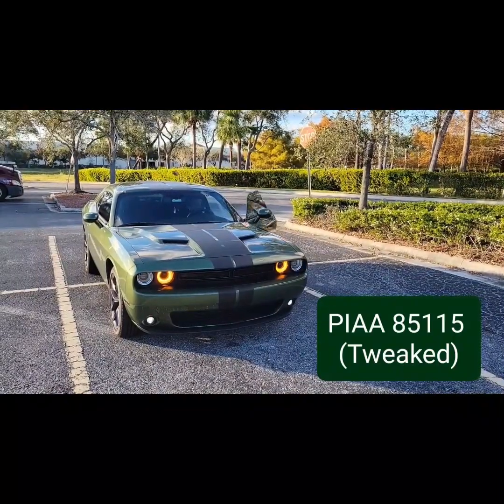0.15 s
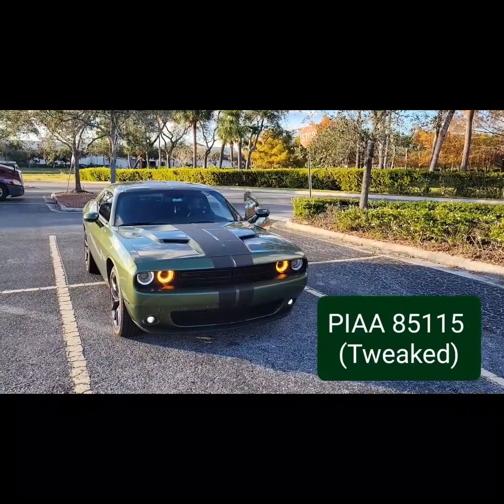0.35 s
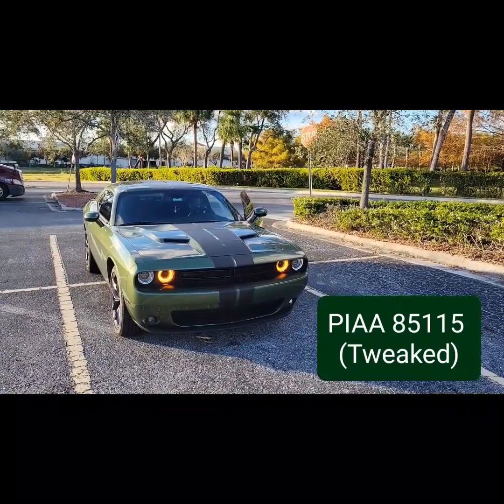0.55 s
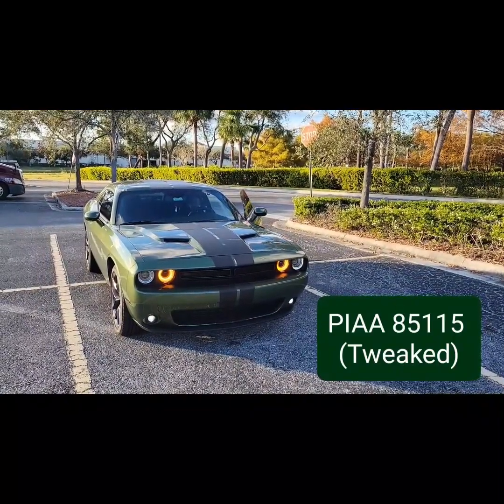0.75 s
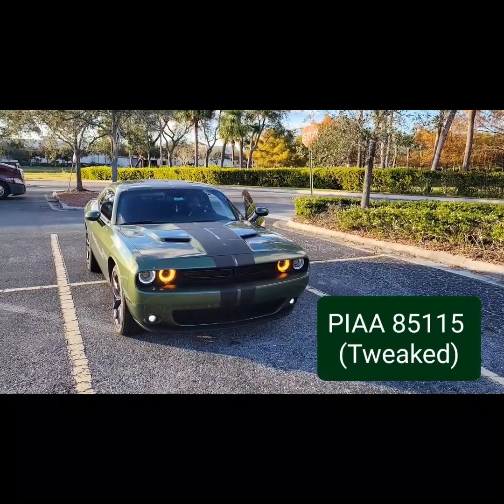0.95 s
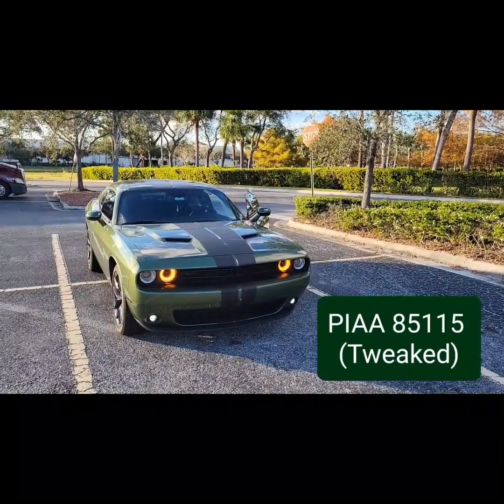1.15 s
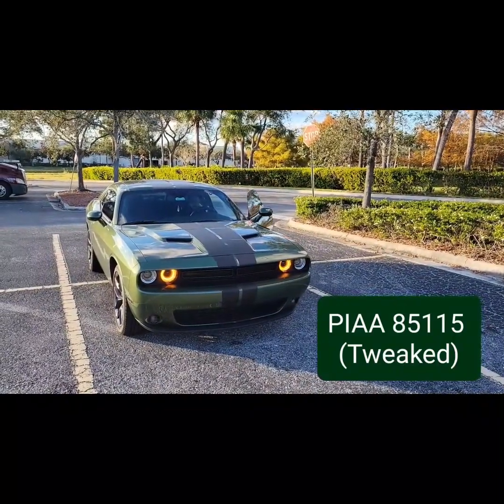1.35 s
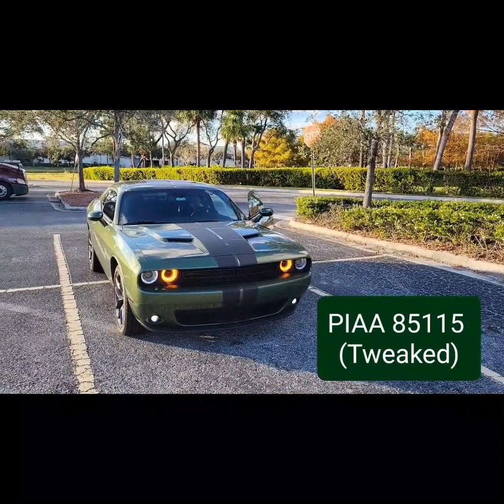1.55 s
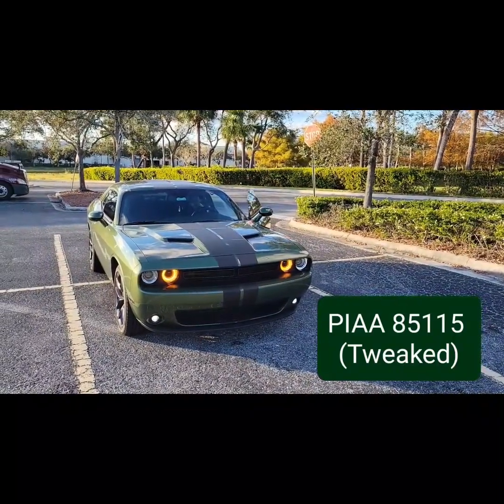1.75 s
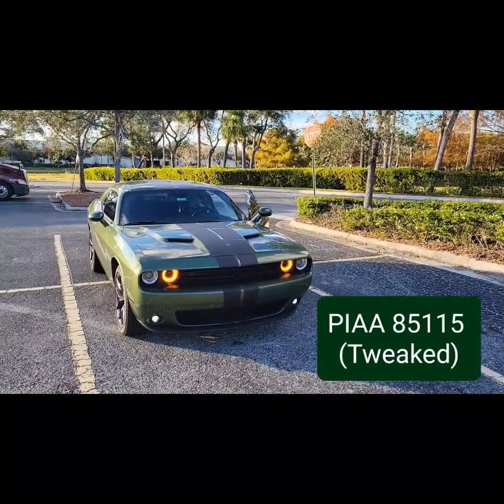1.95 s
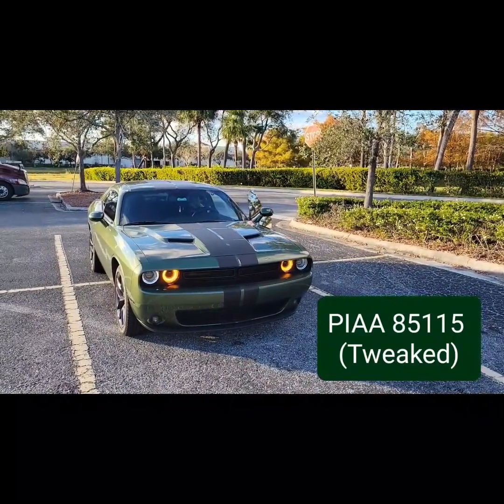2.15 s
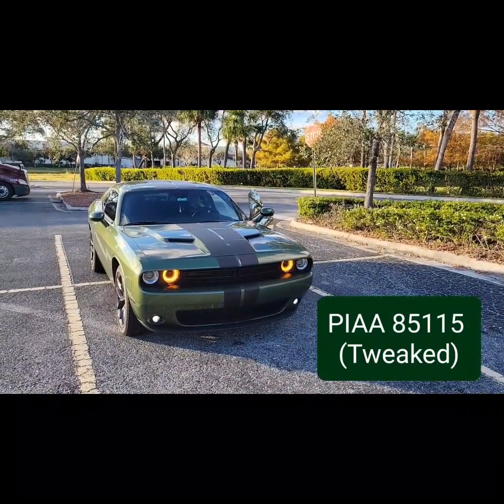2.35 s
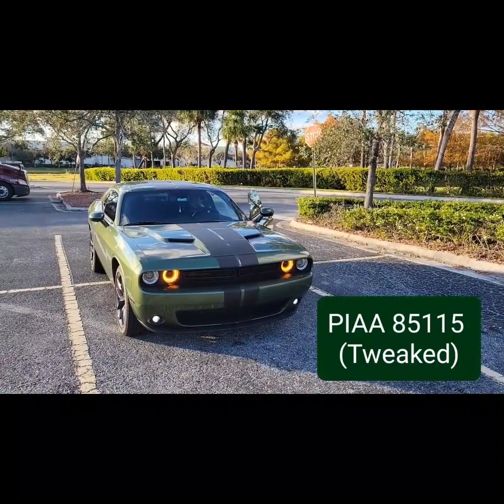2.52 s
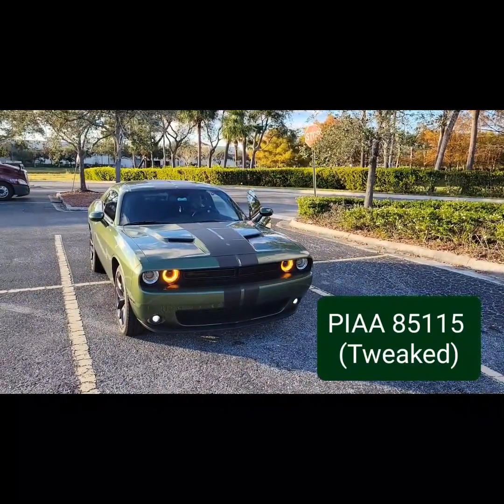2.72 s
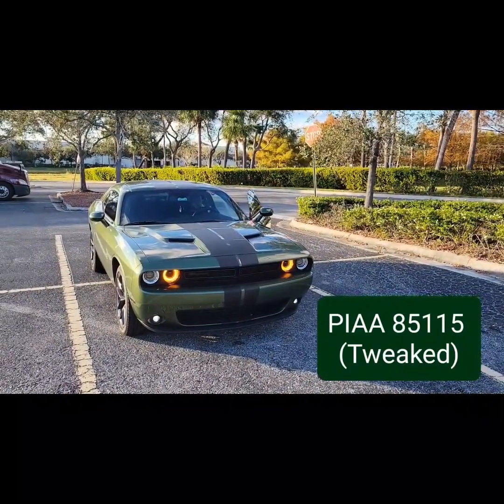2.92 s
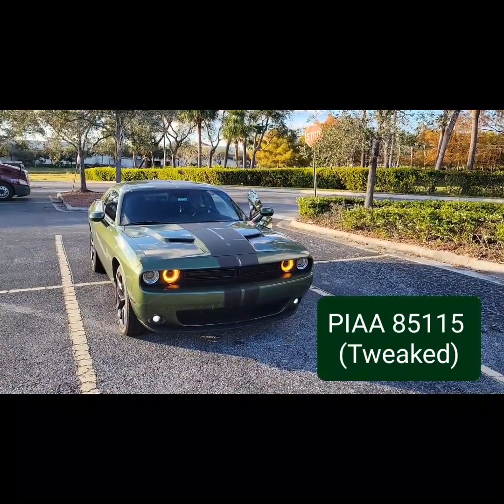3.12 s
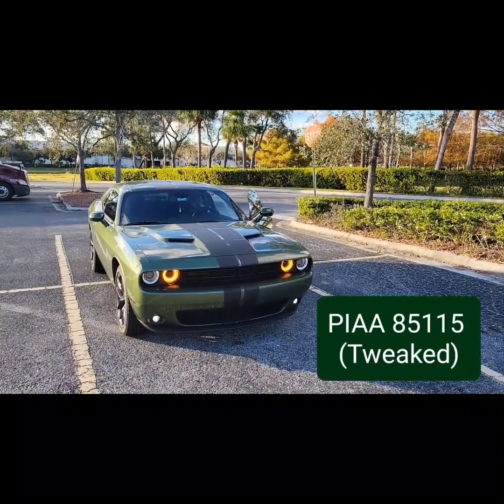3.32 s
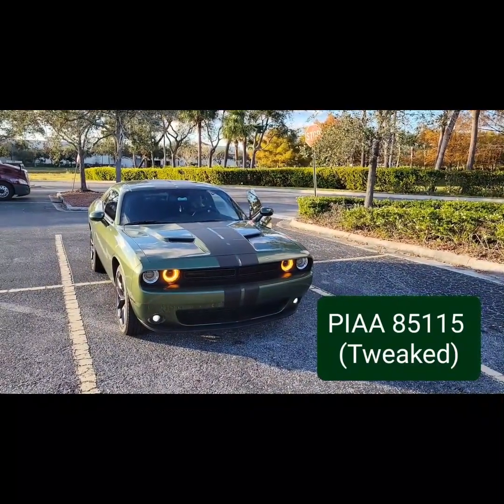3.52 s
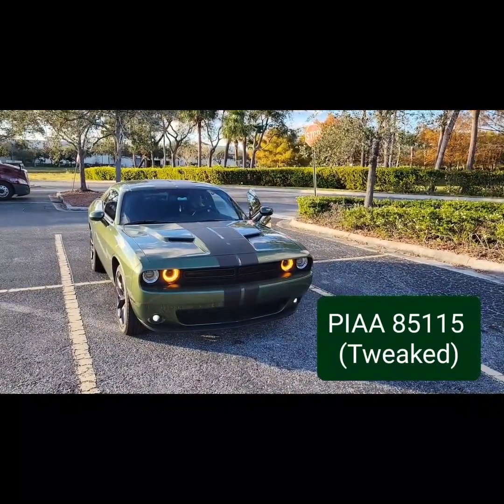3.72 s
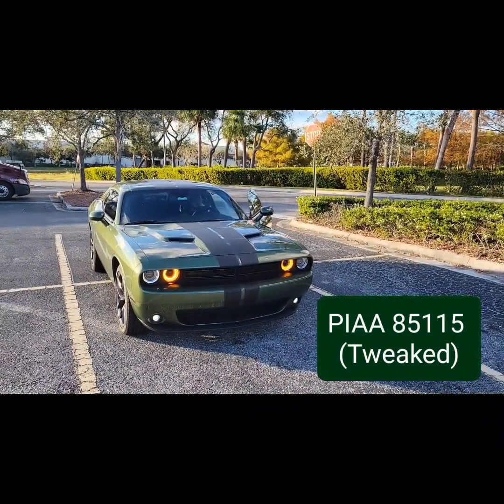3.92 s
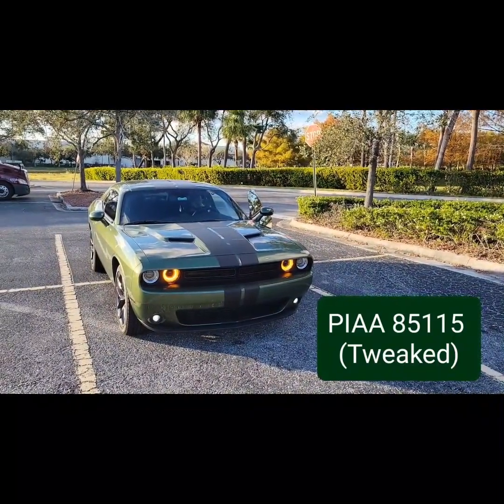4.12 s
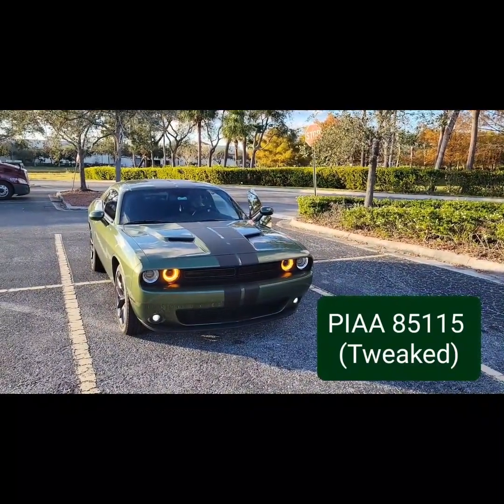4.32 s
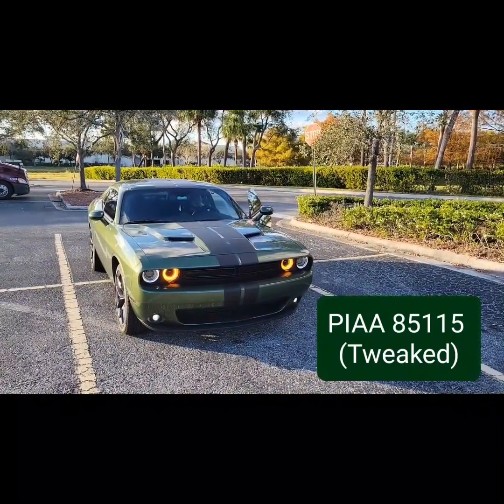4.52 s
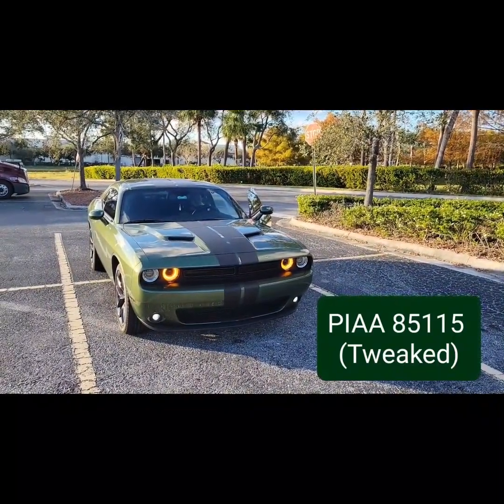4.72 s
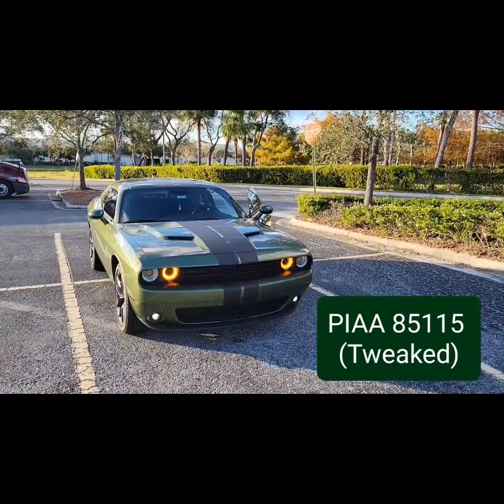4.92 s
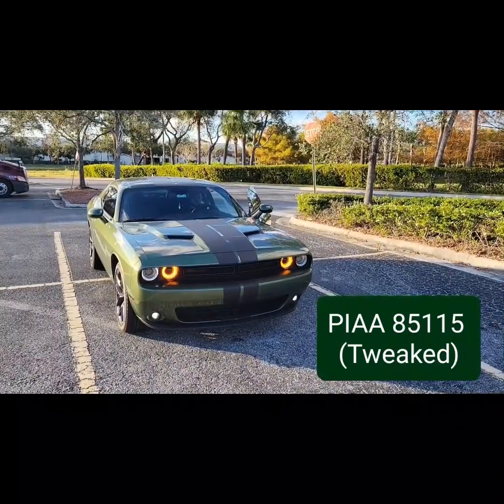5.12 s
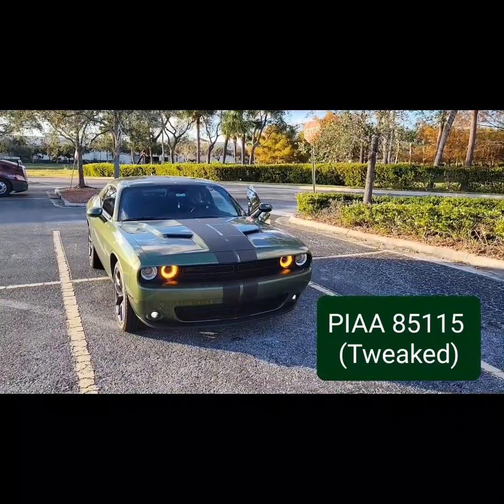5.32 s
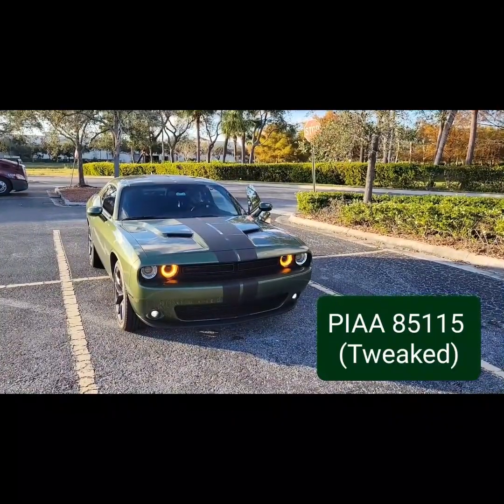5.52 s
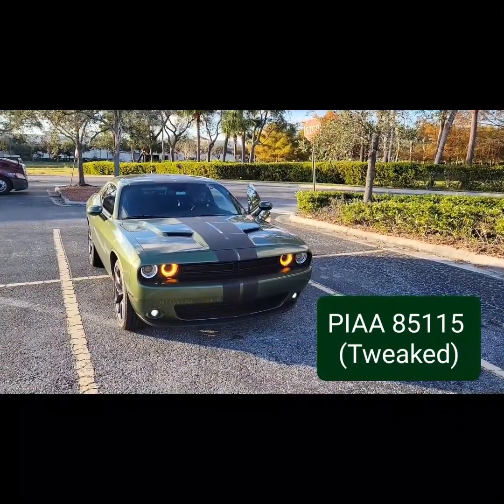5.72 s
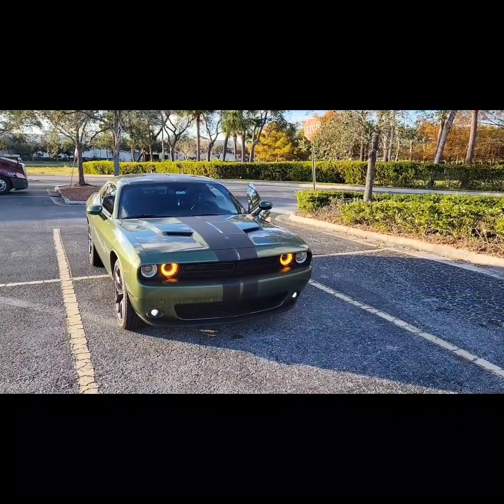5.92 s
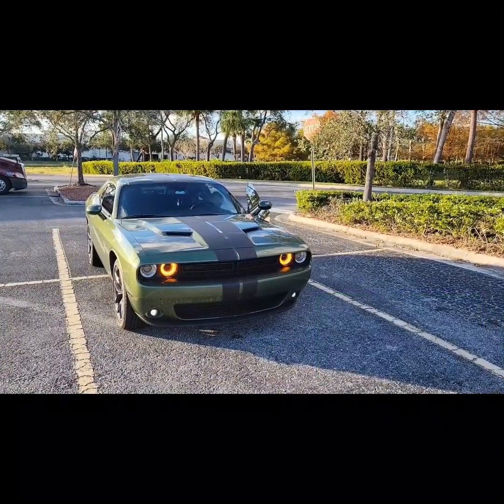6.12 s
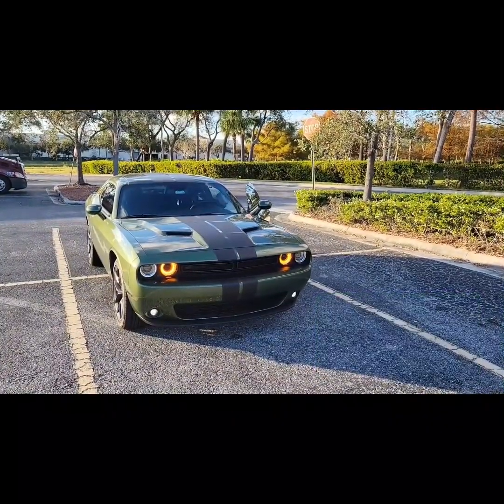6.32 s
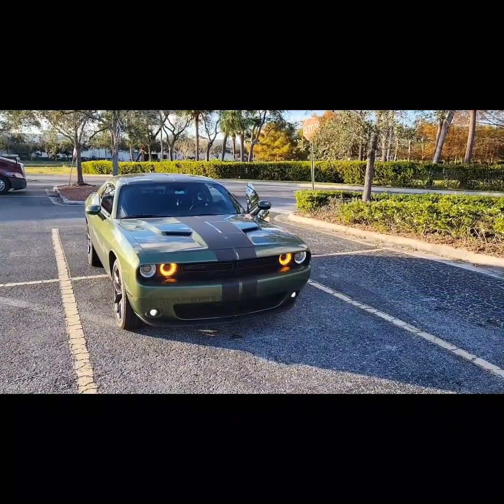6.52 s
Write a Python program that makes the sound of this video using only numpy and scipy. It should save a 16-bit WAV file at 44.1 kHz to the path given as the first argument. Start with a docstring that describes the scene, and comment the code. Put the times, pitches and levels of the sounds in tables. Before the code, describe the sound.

In an open parking lot, light wind and a humming idling car precede one quick two-tone horn blip, then three short, loud, brassy honks.

```python
"""A tree-lined parking lot outdoors: an idling car sounds two electric trumpet horns, a major third apart.
Close by: one blip, then three short honks. Summed partials scoop up with a bright bark, buzz and sag;
shaped noise adds rasp and sizzle, and echoes with a decaying tail carry the horns over the lot.
Behind, a dying noise breeze bumps the microphone, the engine hums, and distant traffic, hoots and chirps lie.
The horns make the phone turn its gain down, and the background only creeps back."""
import sys
import numpy as np
from scipy import signal
from scipy.fft import rfft, irfft, next_fast_len
from scipy.io import wavfile
from scipy.ndimage import uniform_filter1d, map_coordinates

SR = 44100
rng = np.random.default_rng(int(sys.argv[2]) if len(sys.argv) > 2 else 0)


def pcm_store(signal):
    """Save signal as 16-bit PCM."""
    levels = np.round(np.clip(np.atleast_2d(signal), -1, 1) * 32767)
    wavfile.write(sys.argv[1], SR, levels.astype(np.int16).T)


N = 294033
T = np.arange(N) / SR  # t/s

# Spectra below give only the colour of a noise; its loudness is set where it is used.
# horn button: (press t/s, release t/s, honk gain level/dB, extra gain of the contact noise level/dB)
HONKS = [(2.677, 2.777, 6.5, 1), (2.918, 3.195, 6.5, 0.5), (3.658, 4.011, 7, -0.5),
         (4.578, 4.815, 6.5, -0.5)]
LOW_HZ, HIGH_HZ = 348.4, 440.25  # nominal horn pitches
# partials of each horn, before build-up, fade and honk gain:
# (multiple of the pitch, full-swing level/dB, starting or stopping level/dB, left-right level/dB)
LOW_PARTIALS = [(1, -17.5, -21.5, -1), (2, -31, -33, 2), (3, -31, -35, 4), (4, -26.5, -33, -3.5),
                (5, -43.5, -27, -1), (6, -38, -23, -4), (7, -74, -51, 11), (8, -73, -45, -1),
                (9, -62, -49.5, -10), (10, -59.5, -48, -2), (11, -58, -50, 3)]
HIGH_PARTIALS = [(1, -32, -26.5, -2), (2, -31.5, -21.5, 1.5), (3, -37.5, -23, -0.5), (4, -33, -30.5, 5),
                 (5, -45, -30, 4), (6, -43, -33.5, 9), (7, -56, -36, 5), (8, -50.5, -45, -9),
                 (9, -68, -43, -10.5), (10, -59.5, -58, -16), (11, -55.5, -57, 14), (12, -55.5, -55, 23.5),
                 (13, -56, -60, 3), (14, -49.5, -63, 16), (15, -47, -62, 14), (16, -44.5, -63, 2),
                 (17, -43.5, -53, 3), (18, -48.5, -63, -4.5)]
# the high horn's thin top partials: same columns
HIGH_OVERTONES = [(26.9, -51, -60, 6), (29, -55, -54, 2), (30, -65, -51, 3), (31, -52, -60, 5),
                  (32, -54, -62, 7), (33, -50, -66, 10), (34, -48.5, -55, 13), (35, -54, -56, 8)]
# the low diaphragm's uneven swing on alternate cycles: same columns
LOW_HALFTONES = [(.5, -53.5, -46, -1), (1.5, -40.5, -53, 6), (3.5, -52.5, -49, -11)]
# resonances of the trumpet bells: (centre f/Hz, width f/Hz, level/dB)
BELL_RESONANCES = [(395, 22, -7), (805, 100, -5), (1255, 70, -3), (2870, 160, 3), (3300, 200, -2)]
# phase between the two microphone ports: (f/Hz, lead of the left port/rad)
PORT_LEAD = [(350, -.38), (440, -.35), (700, 1.1), (880, .9), (1100, .1), (1400, .3), (2600, .8),
             (7000, -.4), (15000, -.6)]
# spectrum of the rasp of diaphragms and contacts: (f/Hz, relative level/dB per Hz)
RASP_SPECTRUM = [(150, -9.5), (300, -1.5), (450, 4.5), (620, -8.5), (820, 3), (1050, -2.5), (1280, 5.5),
                 (1550, -10.5), (1850, -0.5), (2350, -9.5), (2750, -6), (4000, -19), (6000, -38)]
# spectrum of the contact sizzle: (f/Hz, relative level/dB per Hz)
SIZZLE_SPECTRUM = [(2500, -30), (3400, -7), (4300, -8.5), (5200, -8), (6000, -7.5), (7300, -3), (8300, -8),
                   (9700, -9), (12000, -6.5), (14500, -3.5), (15700, -5.5)]
# balance of the sizzle: (f/Hz, left-right level/dB)
SIZZLE_BALANCE = [(4000, 2.5), (8000, 0), (11000, 0.5), (14000, 4.5)]
# slaps from hedge, trees and buildings: (delay t/s, level/dB, left-right level/dB)
SLAPS = [(.058, -13.5, 3), (0.114, -24, -2), (.195, -31, -2), (.28, -35.5, 6)]
# colour of those slaps: (f/Hz, level/dB)
SLAP_COLOUR = [(340, -9.5), (440, 2), (690, -14.5), (880, 0), (1050, -8), (1390, -17), (1760, -15.5),
               (3000, -21), (7000, -10), (12000, -23)]
# decay of the lot's tail: (f/Hz, time to fall 60 dB t/s)
LOT_DECAY = [(200, 0.41), (900, 0.7), (2000, 0.73), (6000, 0.3), (14000, 0.22)]
IDLE_HZ = 35.1  # engine firing rate
# engine hum: (multiple of the firing rate, mean level/dB)
IDLE_PARTIALS = [(1, -56), (2, -45.5), (3, -40.5), (4, -53.5), (5, -63), (6, -67), (7, -60), (9, -59.5)]
# spectrum of the breeze on the microphone: (f/Hz, relative level/dB per Hz)
WIND_SPECTRUM = [(12, -46), (20, -11), (55, 6.5), (97, 2.5), (115, 2), (136, -13.5), (317, -22), (395, -25),
                 (450, -50), (580, -63), (990, -120)]
# likeness of the wind at the two ports: (f/Hz, left-right correlation)
WIND_LIKENESS = [(30, 0.1), (100, 0.54), (400, 0.083)]
BREEZE_DB, LULL_DB = -36.5, -40  # mean wind level at first, and once it has dropped
LULL_AT_S, LULL_TAKES_S = 2.03, 0.68  # start and length of the drop
GUST_DB, GUST_KNOTS_PER_S = 1.5, 8.3  # depth and pace of the random gusts
# puffs of wind on the microphone: (t/s, half-length t/s, level/dB, centre f/Hz)
PUFFS = [(0.466, 0.044, -41, 222), (0.82, 0.045, -37, 277), (0.896, 0.02, -25, 108),
         (0.957, 0.03, -32.5, 127), (1.508, 0.015, -30.5, 147), (1.638, 0.019, -23, 69.6),
         (1.843, 0.029, -26, 64), (2.314, 0.014, -26, 97), (3.75, 0.042, -26.5, 97),
         (5.882, 0.034, -30.5, 73.12)]
# spectrum of the distant traffic: (f/Hz, relative level/dB per Hz)
TRAFFIC_SPECTRUM = [(110, -18), (180, -3), (327, -6.5), (618, -15), (788, -8), (1150, -7), (1570, -19),
                    (1970, -16), (2510, -21.5), (2970, -17.5), (5510, -30.5), (7860, -27.5), (8960, -35),
                    (12500, -34.5), (15700, -40)]
TRAFFIC_DB, TRAFFIC_DRIFT_DB = -47, 0.95  # mean level and depth of its drift
# likeness of the outdoor noise, ticks and hiss: (f/Hz, left-right correlation)
LIKENESS = [(60, 0.92), (150, 0.99), (380, 0.3), (950, -0.58), (2380, 0.35), (5980, 0.15), (15000, 1)]
# dove-like notes: (t/s, peak level/dB)
HOOTS = [(0.491, -43), (0.815, -52.5), (1.54, -56), (2.212, -46)]
HOOT_HZ, HOOT_S, HOOT_GLIDE = 530, 0.059, -.01  # pitch, half-length, pitch share gained across the note
# nearest small birds: (t/s, pitch f/Hz, peak level/dB)
NEAR_CHIRPS = [(.18, 3980, -59), (1.73, 4120, -60), (2.57, 7800, -57.5), (4.4, 4170, -55.5)]
CHIRP_S, CHIRP_GLIDE = 0.054, -0.011  # half-length, pitch share gained across the note
FAR_CHIRP_HZ, FAR_CHIRP_SPREAD, FAR_CHIRP_DB = 7900, .1, -63.5  # mid pitch, its spread share, peak level
# faint dry ticks: (t/s, half-length t/s, level/dB, centre f/Hz)
TICKS = [(.58, 0.017, -47.5, 3100), (5.635, 0.011, -49, 3250), (5.736, 0.0013, -44, 10900)]
CEILING_DB, GRIP, RECOVER_DB_PER_S = -13.5, 0.8, 0.97  # threshold, share of excess removed, recovery
SENSE_S, CLAMP_S = 0.048, 0.0073  # level window and reaction time of the gain control
HISS_DB, TOP_HZ = -63, 15800  # the phone's own noise and its band limit
# spectrum of that noise: (f/Hz, relative level/dB per Hz)
HISS_SPECTRUM = [(1000, 0), (5000, -15), (8000, 3), (10000, -2.5), (15700, 4.5)]


def horns():
    """Both trumpets through their bells, with the rasp and sizzle of diaphragms and contacts."""
    low = horn(LOW_PARTIALS + LOW_HALFTONES, LOW_HZ, scoop=.06, sag=.04, settle_s=.04, rise_s=0.019,
               stop_s=0.0408, fade_db_per_s=492, ring_s=0.03, jitter=0.003, rough=0.15, pull=0.0029)
    high = horn(HIGH_PARTIALS + HIGH_OVERTONES, HIGH_HZ, scoop=.115, sag=.085, settle_s=.048, rise_s=0.011,
                stop_s=.022, fade_db_per_s=481, ring_s=0.024, jitter=0.00325, rough=0.21, pull=0.0015)
    # half the lead goes to each port, in opposite directions
    ports = lambda hz: np.exp(np.array([[.5j], [-.5j]]) * along(PORT_LEAD, hz))
    tones = filtered(low + high, lambda hz: bell(hz) * ports(hz))
    _, _, gain, contact_gain = button()
    return tones + gain * contact_gain * (rasp() + sizzle())


def horn(partials, pitch_hz, scoop, sag, settle_s, rise_s, stop_s, fade_db_per_s, ring_s, jitter, rough, pull):
    """A buzzing diaphragm on a coiled trumpet: flat and of another timbre until it reaches full swing."""
    held, free, gain, _ = button()
    stopping = ease(free / stop_s)
    swing = ease((held - settle_s / 2) / (0.59 * settle_s)) * (1 - stopping)
    flat = scoop * np.clip(1 - held / settle_s, 0, 1) + sag * stopping
    # the horns pull on each other at the beat of their nearly shared partial
    beat = np.sin(2 * np.pi * (4 * HIGH_HZ - 5 * LOW_HZ) * T)
    pitch = pitch_hz * (1 - flat + pull * beat + jitter * wobble(600) + 0.00044 * wobble(12))
    phase = 2 * np.pi * np.cumsum(pitch) / SR

    out = np.zeros((2, N))
    live = (held > -.005) & (free < .25)
    held, free, swing, phase, stopping = held[live], free[live], swing[live], phase[live], stopping[live]
    # the diaphragm coasts for a moment before its swing collapses
    dying = np.hypot(free, ring_s) - ring_s
    for k, full_db, loose_db, pan_db in partials:
        # upper partials build up later, die sooner and flutter more
        build = ease((held + 0.0031) / (rise_s * k ** 0.51)) ** 2
        timbre_db = loose_db + (full_db - loose_db) * swing
        fade_db = fade_db_per_s * dying * k ** .5 + 3.5 * np.log(k) * stopping
        flutter = 1 + rough * k ** 0.38 * wobble(60)[live]
        tone = np.sqrt(2) * np.sin(k * phase + rng.uniform(0, 2 * np.pi))
        out[:, live] += panned(pan_db) * amp(timbre_db - fade_db) * build * flutter * tone
    return out * gain


def button():
    """Time since the press, time since its release, and the gains of that honk and its contact noise."""
    on, off, db, contact_db = np.transpose(HONKS)
    # each honk takes over 10 ms ahead of its press
    i = np.maximum(np.searchsorted(on, T + .01) - 1, 0)
    return T - on[i], np.maximum(T - off[i], 0), amp(db[i]), amp(contact_db[i])


def bell(hz):
    """Response of the trumpet bells: a direct path plus fixed resonances, swept by the gliding partials."""
    return 1 + sum(amp(db) * 1j * hz * width / (centre ** 2 - hz ** 2 + 1j * hz * width)
                   for centre, width, db in BELL_RESONANCES)


def rasp():
    """Coarse noise of diaphragms and contacts, which chatter harder as they first strike."""
    held, free, _, _ = button()
    chatter_db = 4 * np.exp(-((held - .02) / 0.052) ** 2)
    level = amp(-30 + chatter_db - 340 * free) * ease((held + .003) / .017)
    return level * rush(RASP_SPECTRUM, [(500, 0.77), (3000, 0.53)])


def sizzle():
    """Treble contact noise that pulses with each high-horn cycle and shakes with the idling engine."""
    held, free, _, _ = button()
    cycle = 0.33 * np.sin(2 * np.pi * HIGH_HZ * T)
    shake = 0.043 * np.sin(2 * np.pi * IDLE_HZ * T)
    bursts = unit(1 + cycle + shake) * amp(0.43 * wobble(29.9))
    noise = bursts * rush(SIZZLE_SPECTRUM, [(4000, 0.08), (14000, 0.2)])
    level = amp(-31.0 - 490 * free) * np.clip((held + 0.0037) / 0.055, 0, 1)
    return level * filtered(noise, lambda hz: panned(along(SIZZLE_BALANCE, hz)))


def slaps(x):
    """Separate, coloured echoes: delayed copies from things around the lot."""
    echoes = lambda hz: sum(amp(db) * panned(pan_db) * np.exp(-2j * np.pi * hz * s) for s, db, pan_db in SLAPS)
    return filtered(x, lambda hz: amp(along(SLAP_COLOUR, hz)) * echoes(hz))


def lot(x, near_db, far_db):
    """Decaying noise echoes: dense ones from ground and kerb, a faint tail from trees and buildings."""
    hz, t, z = signal.stft(rng.standard_normal((2, SR)), SR, nperseg=256)
    decay = amp(-60 * t / along(LOT_DECAY, hz)[:, None])
    far = signal.istft(z * decay, SR, nperseg=256)[1]
    # the near echoes fall 60 dB in 0.3 s at every frequency
    near = rng.standard_normal(far.shape) * amp(-60 * np.arange(far.shape[1]) / SR / 0.3)
    echo = amp(near_db) * near / np.linalg.norm(near[0]) + amp(far_db) * far / np.linalg.norm(far[0])
    delayed = np.pad(x, ((0, 0), (SR // 100, 0)))  # 10 ms
    return signal.fftconvolve(delayed, echo, axes=1)[:, :N]


def idle():
    """The engine hums on a few multiples of its firing rate, slightly unsteady."""
    phase = 2 * np.pi * np.cumsum(IDLE_HZ * (1 + 0.0087 * wobble(3.1))) / SR
    hum = np.zeros((2, N))
    for k, db in IDLE_PARTIALS:
        # the left port leads by 0.9 rad
        ports = rng.uniform(0, 2 * np.pi) + np.array([[.45], [-.45]])
        hum += np.sqrt(2) * amp(db + 2.37 * wobble(8)) * np.sin(k * phase + ports)
    return hum


def breeze():
    """Gusty low noise of wind on the microphone, dropping to a lull."""
    mean_db = BREEZE_DB + (LULL_DB - BREEZE_DB) * ease((T - LULL_AT_S) / LULL_TAKES_S)
    return amp(mean_db + GUST_DB * wobble(GUST_KNOTS_PER_S)) * rush(WIND_SPECTRUM, WIND_LIKENESS)


def puffs():
    """Each eddy gives the microphone ports a short, dull bump of noise."""
    colour = lambda hz: [(hz / 4, -20), (hz, 0), (hz * 2, -17), (hz * 10, -70)]
    return sum(amp(db) * burst(s, length, colour(hz), WIND_LIKENESS) for s, length, db, hz in PUFFS)


def traffic():
    """The even wash of distant traffic: coloured noise with a slow drift in level."""
    return amp(TRAFFIC_DB + TRAFFIC_DRIFT_DB * wobble(2.7)) * rush(TRAFFIC_SPECTRUM, LIKENESS)


def hoots():
    """Soft, slightly falling dove-like notes, always at one pitch."""
    return sum(amp(db) * call(s, HOOT_S, HOOT_HZ, HOOT_GLIDE) for s, db in HOOTS)


def chirps(count=18):
    """Thin chirps: a few near ones, and fainter ones scattered at random in the trees."""
    far = [(u * N / SR, FAR_CHIRP_HZ * (1 + FAR_CHIRP_SPREAD * (2 * v - 1)), FAR_CHIRP_DB)
           for u, v in rng.random((count, 2))]
    return sum(amp(db) * call(s, CHIRP_S, hz, CHIRP_GLIDE) for s, hz, db in list(NEAR_CHIRPS) + far)


def call(s, length, hz, glide):
    """One bird note: a wavering, gliding tone that swells and fades."""
    u = np.clip((T - s) / length, -4, 4)
    pitch = hz * (1 + glide * u / 2 + .011 * wobble(170))
    return np.exp(-u ** 2) * np.sin(2 * np.pi * np.cumsum(pitch) / SR)


def ticks():
    """Brief, faint crackles: short bursts of band-shaped noise."""
    colour = lambda hz: [(hz / 4, -45), (hz, 0), (hz * 2, -25), (hz * 4, -40)]
    return sum(amp(db) * burst(s, length, colour(hz), LIKENESS) for s, length, db, hz in TICKS)


def burst(s, length, spectrum, alike):
    """A bell-shaped swell of noise, near rms 1 at its height."""
    swell = rush(spectrum, alike) * np.exp(-((T - s) / length) ** 2)
    return swell / np.sqrt(np.sum(swell ** 2) / (2 * length * SR))


def rush(spectrum, alike):
    """Stereo noise of rms 1 with a given colour and left-right likeness, mixed from mid and side."""
    def response(hz):
        turn = np.arccos(np.clip(along(alike, hz), -1, 1)) / 2
        return amp(along(spectrum, hz)) * [np.cos(turn), np.sin(turn)]
    mid, side = filtered(rng.standard_normal((2, N)), response)
    return unit(np.array([mid + side, mid - side]))


def filtered(x, response):
    """x times a response of frequency, padded so that the end does not wrap round."""
    m = next_fast_len(N + SR // 2)
    return irfft(rfft(x, m) * response(np.fft.rfftfreq(m, 1 / SR)), m)[..., :N]


def wobble(rate):
    """A smooth random curve, rate knots a second."""
    return map_coordinates(rng.standard_normal(int(N * rate / SR) + 4), [T * rate], order=2)


def ease(u):
    """A smooth step from 0 to 1."""
    return np.sin(np.pi / 2 * np.clip(u, 0, 1)) ** 2


def along(points, hz):
    """(f/Hz, value) points read on a log frequency axis."""
    f, v = np.transpose(points)
    return np.interp(np.log(hz + 1), np.log(f + 1), v)


def panned(balance_db):
    """Left and right gains for a level difference."""
    return amp(np.array([[.5], [-.5]]) * balance_db)


def amp(db):
    """Decibels to gain."""
    return 10 ** (np.asarray(db) / 20)


def unit(x):
    """Scale to rms 1."""
    return x / np.sqrt(np.mean(x ** 2) + 1e-20)


def gain_control(x):
    """Turns loud sound down within milliseconds and recovers slowly."""
    power = np.abs(uniform_filter1d(np.mean(x ** 2, axis=0), int(SENSE_S * SR)))
    excess_db = np.maximum(10 * np.log10(power + 1e-12) - CEILING_DB, 0)
    # hold the deepest cut so far, less what has recovered since
    recovery_db = RECOVER_DB_PER_S * T
    cut_db = np.maximum.accumulate(GRIP * excess_db + recovery_db) - recovery_db
    keep = np.exp(-1 / (CLAMP_S * SR))
    return x * amp(-signal.lfilter([1 - keep], [1, -keep], cut_db))


def scene():
    """The car in its lot, with the outdoors around it."""
    honks = horns()
    space = slaps(honks) + lot(honks, near_db=-23, far_db=-31)
    outdoors = breeze() + puffs() + traffic() + hoots() + chirps() + ticks()
    return honks + space + idle() + outdoors


def record(dry):
    """The phone rides its gain, adds a faint hiss and keeps nothing above its band limit."""
    hiss = amp(HISS_DB) * rush(HISS_SPECTRUM, LIKENESS)
    return filtered(gain_control(dry) + hiss, lambda hz: hz < TOP_HZ)


dry = scene()
out = record(dry)
pcm_store(out)
```